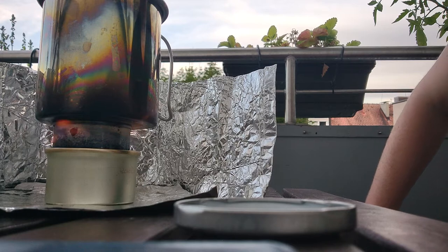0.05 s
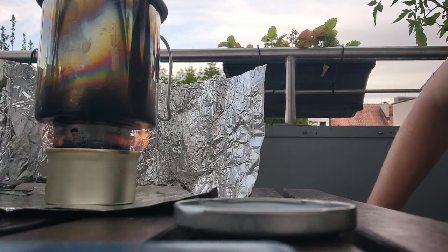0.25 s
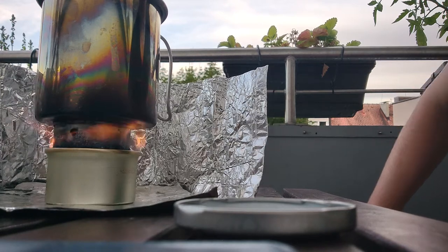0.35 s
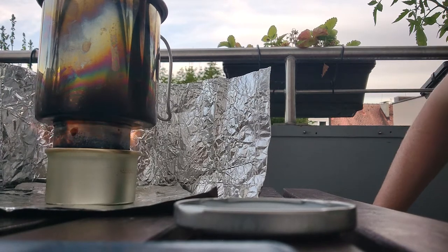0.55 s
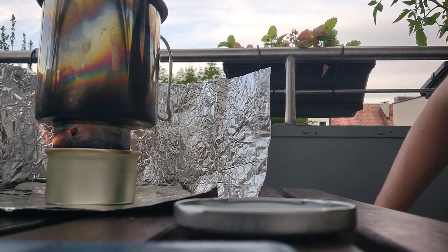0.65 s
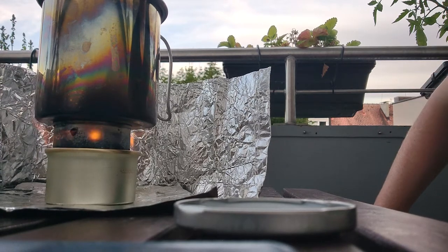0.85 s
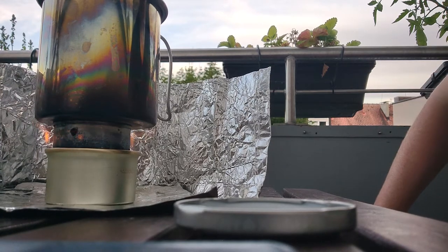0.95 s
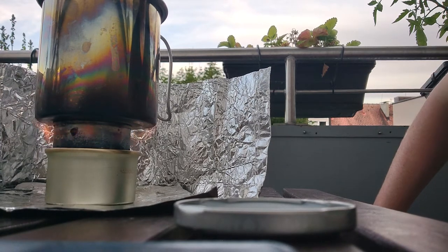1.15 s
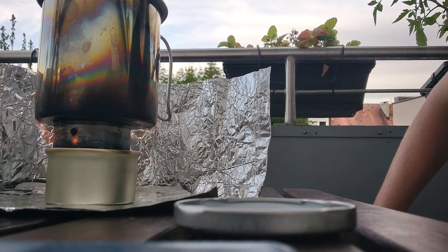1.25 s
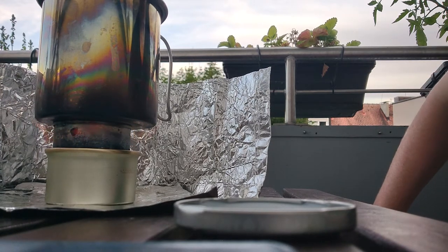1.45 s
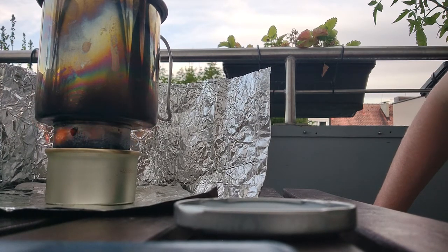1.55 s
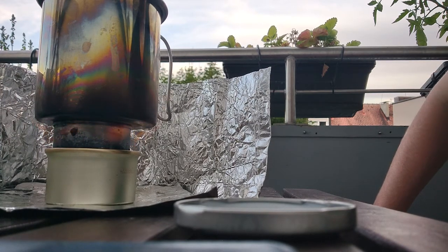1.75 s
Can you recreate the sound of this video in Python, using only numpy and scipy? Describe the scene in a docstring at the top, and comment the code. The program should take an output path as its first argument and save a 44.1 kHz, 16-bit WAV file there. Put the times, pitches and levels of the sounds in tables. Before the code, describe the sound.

A small alcohol stove catches under a steel pot with one short, fluttering puff. The flame settles to a faint, sputtering hiss, the metal ticks once, and a small bird chirps faintly twice, on a quiet balcony.

```python
"""On a quiet balcony, alcohol vapour catches under a steel pot: one short puff of turbulent noise, a bright
rush that sinks into a low flutter, coloured by the resonances of the pot and its foil windscreen.
The flame settles to a faint, sputtering burn with a low hum, and the metal ticks once in its own modes.
A small bird, probably a sparrow, chirps twice across the yard, which echoes both puff and chirps."""
import sys
import numpy as np
from scipy import signal
from scipy.io import wavfile

SR = 44100
rng = np.random.default_rng(int(sys.argv[2]) if len(sys.argv) > 2 else 0)


def wav_out(sig):
    """Save sig, one row per channel (or a flat mono array), as 16-bit PCM at SR to the path in sys.argv[1]."""
    wavfile.write(sys.argv[1], SR, np.round(np.clip(np.atleast_2d(sig).T, -1, 1) * 32767).astype(np.int16))


N = 79380
T = np.arange(N) / SR

# pops and flaps of the spreading flame: start_s, level_db, pitch_hz
POPS = [(.218, -21, 765), (0.2332, -17, 1100), (0.244, -20, 450), (0.256, -12.5, 1250), (0.268, -16.5, 150),
        (.284, -19, 159.8), (.296, -22, 220), (0.3177, -24.5, 134), (0.345, -27.5, 96.5), (.405, -42, 75)]
# stereo position of the quiet noises: frequency_hz, left_minus_right_db
QUIET_BALANCE = [(60, 9.5), (110, -7), (200, 8), (380, -0.5), (700, 0), (1290, -0.5), (2380, -5.5),
                 (4400, -3.5), (8120, 2), (15000, -0.5)]
# likeness of their two channels: frequency_hz, correlation
QUIET_CORRELATION = [(60, 0.94), (250, 0.8), (1000, 0.34), (4000, 0.22), (14000, 0.069)]


def from_db(db):
    """Amplitude ratio of a level in decibels."""
    return 10 ** (np.asarray(db) / 20)


def unit_rms(x):
    """Normalisation to unit power."""
    return x / np.sqrt(np.mean(x ** 2) + 1e-20)


def at_hz(rows, hz):
    """A table's columns, interpolated on a logarithmic frequency axis."""
    frequencies, *columns = np.transpose(rows)
    return [np.interp(np.log(hz), np.log(frequencies), column) for column in columns]


def filtered(x, hz, kind, order=2):
    """Maximally flat low-, high- or band-pass filter."""
    return signal.sosfilt(signal.butter(order, hz, kind, fs=SR, output="sos"), x)


def pan(left_minus_right_db):
    """Direction by level difference, at constant total power."""
    return unit_rms(from_db([[left_minus_right_db / 2], [-left_minus_right_db / 2]]))


def drift(corner_hz):
    """Random modulation of unit rms: low-passed noise, drawn at every 20th sample."""
    pole = np.exp(-2 * np.pi * corner_hz * 20 / SR)
    slow = signal.lfilter([1], [1, -2 * pole, pole * pole], rng.standard_normal(N // 10))[N // 20:]
    return np.interp(np.arange(N) / 20, np.arange(len(slow)), unit_rms(slow))


def swell(full_s, hold_s, rise_db_per_s, fall_db_per_s):
    """Exponential growth, a plateau, then exponential decay."""
    before_s, after_s = np.maximum(full_s - T, 0), np.maximum(T - full_s - hold_s, 0)
    return from_db(-rise_db_per_s * before_s - fall_db_per_s * after_s)


def decay(start_s, t60_s):
    """Exponential decay after a sudden onset."""
    return (T >= start_s) * from_db(-60 * np.maximum(T - start_s, 0) / t60_s)


def resonate(x, hz, width_hz):
    """Damped resonator with unit gain at its peak."""
    radius = np.exp(-np.pi * width_hz / SR)
    feedback = [1, -2 * radius * np.cos(2 * np.pi * hz / SR), radius ** 2]
    return signal.lfilter(np.array([1, 0, -1]) * (1 - radius ** 2) / 2, feedback, x + 1e-18)


def banded_noise(gain_at, correlation=QUIET_CORRELATION, balance=QUIET_BALANCE):
    """Partly coherent stereo noise, summed band by band; gain_at(hz) is the rms in one octave."""
    edges_hz = np.r_[np.geomspace(40, 7200, 16), 9500, 12000, 14200, 16200]
    out, white = 0, rng.standard_normal((2, 2, N))
    for k, (low, high) in enumerate(zip(edges_hz, edges_hz[1:])):
        mid, side = unit_rms(filtered(white[k % 2], [low, high], "band"))
        hz, octaves = np.sqrt(low * high), np.log2(high / low)
        alike = np.clip(at_hz(correlation, hz)[0], -1, 1)
        pair = np.sqrt(1 + alike) * mid + np.sqrt(1 - alike) * side * [[1], [-1]]
        out = out + gain_at(hz) * pan(at_hz(balance, hz)[0]) * pair * np.sqrt(octaves / 2)
    return out


def flickering_noise(spectrum, flicker_db):
    """Random amplitude modulation: each band wavers independently about its level."""
    return banded_noise(lambda hz: from_db(at_hz(spectrum, hz)[0] + flicker_db * drift(16)))


def air():
    """Ambient noise: the faint broadband floor of the open air."""
    # frequency_hz, octave_level_db
    spectrum = [(30, -98), (60, -87.5), (110, -78.5), (200, -78.5), (400, -77.5), (900, -83), (1800, -84),
                (3300, -75), (7000, -87.5), (14000, -83)]
    return flickering_noise(spectrum, flicker_db=0.64)


def puff(roughness_db=1.56, surge_db=2, surge_s=0.0036, catch_s=0.203, spent_s=0.345):
    """Turbulent combustion: the treble peaks first and dies fast; the bass lasts while there is vapour."""
    # the rush by register: frequency_hz, octave_level_db, full_s, hold_s, rise_db_per_s, fall_db_per_s
    registers = [(35, -68, 0.51, 0.032, 498, 172), (71, -45, 0.24, 0.069, 415.5, 172),
                 (176, -33.5, 0.2465, 0.025, 482, 220), (560, -38.5, 0.239, 0.047, 700, 282),
                 (1160, -32.5, 0.2378, 0.013, 739, 291), (2000, -36, 0.2364, 0.015, 872, 389.5),
                 (3710, -30, 0.2341, 0.015, 958, 406), (8100, -33, 0.2357, 0.011, 1454, 452),
                 (13300, -25.5, 0.2334, 0.003, 1792.5, 589)]
    # its stereo position: frequency_hz, left_minus_right_db
    balance = [(60, -15.5), (110, -0.5), (200, 2), (380, -5), (700, -2.5), (1290, -1), (2380, -5),
               (4400, -4), (8120, 1), (15000, 5)]
    # likeness of its two channels: frequency_hz, correlation
    correlation = [(60, 0.59), (200, .8), (600, 0.68), (1200, 0.51), (3000, 0.21), (7000, 0.13),
                   (14000, -0.24)]
    surges = sum(np.exp(-((T - start_s) / surge_s) ** 2) for start_s, _, _ in POPS)
    flame = from_db(roughness_db * drift(82) + surge_db * (surges - 0.5))
    flame *= swell(catch_s, spent_s - catch_s, rise_db_per_s=280, fall_db_per_s=480)

    def gain_at(hz):
        level_db, *shape = at_hz(registers, hz)
        return from_db(level_db) * swell(*shape) * flame
    return pot(banded_noise(gain_at, correlation, balance))


def pot(x, coupling=1):
    """Forced resonance: the pot and burner boost the flame's noise at their natural frequencies."""
    # resonances at full coupling: frequency_hz, width_hz, boost_db
    modes = [(204, 30, 2), (661, 13, 4), (745, 8.5, 8), (947.6, 31, 7.5), (1014, 37, 6), (1393, 115, 7.5),
             (2180, 52, 2.5), (2354, 100, 10.5), (2639, 39, 10.5), (3150, 56, 10.5), (3910, 85, 10),
             (4120, 32, 11), (4612, 45, 11.5), (8200, 31, 4), (13800, 23, 13.5)]
    return x + coupling * sum((from_db(db) - 1) * resonate(x, hz, width) for hz, width, db in modes)


def echoes(x, t60_s, dull_hz=5100):
    """Diffuse reverberation: dense, dull reflections that die away, different on each side."""
    response = filtered(rng.standard_normal((2, N)), dull_hz, "low") * decay(0, t60_s)
    return signal.fftconvolve(np.atleast_2d(x), unit_rms(response) / np.sqrt(N), axes=1)[:, :N]


def pops(cycles_to_fall_60_db=1.62):
    """Heavily damped oscillation: each flap of the flame is about one swing of pressure."""
    out = 0
    for start_s, level_db, pitch_hz in POPS:
        cycles = np.maximum(T - start_s, 0) * pitch_hz
        out = out + from_db(level_db - 60 * cycles / cycles_to_fall_60_db) * np.sin(2 * np.pi * cycles)
    return out * pan(-2)


def burn(start_s=0.23, grow_s=0.06, settle_db_per_s=24):
    """Combustion noise: a faint hiss and a dying rumble excite the pot weakly, above a hum."""
    # the steady flame: frequency_hz, octave_level_db
    hiss_spectrum = [(60, -85.5), (200, -92.5), (500, -92), (1200, -77), (1800, -85), (2700, -72.5),
                     (4200, -73), (6000, -79), (9500, -87.5), (13000, -77), (15000, -73)]
    # the settling flame at its start: frequency_hz, octave_level_db
    rumble_spectrum = [(40, -76), (90, -65.5), (180, -60.5), (380, -62.5), (800, -63.5), (1600, -67),
                       (4000, -69), (14000, -105)]
    rumble = flickering_noise(rumble_spectrum, flicker_db=2) * from_db(-settle_db_per_s * (T - start_s))
    hiss = flickering_noise(hiss_spectrum, flicker_db=0.2)
    alight = np.clip((T - start_s) / grow_s, 0, 1)
    return alight * (pot(hiss + rumble, coupling=0.4) + hum())


def hum(pitch_hz=205.7, level_db=-76.5, swell_at_s=1.168, swell_s=0.017, swell_db=-62):
    """Narrow-band noise is heard as a wavering hum; a brief tone at the same pitch swells it once."""
    wavering = from_db(level_db) * unit_rms(resonate(rng.standard_normal(N), pitch_hz, width_hz=11.2))
    envelope = from_db(swell_db) * np.exp(-((T - swell_at_s) / swell_s) ** 2)
    tone = np.sqrt(2) * np.sin(2 * np.pi * pitch_hz * T)
    return (wavering + envelope * tone) * pan(-1)


def bird(buzz_hz=355, buzz_jitter=0.1035, swing_hz=430, buzz_depth=0.4, waver_hz=90):
    """Fast frequency and amplitude modulation make an arching whistle rasp; walls and yard reflect it."""
    # the two calls: start_s, level_db
    chirps = [(0.267, -53.5), (1.383, -49)]
    # the contour that they share: elapsed_s, pitch_hz, relative_db
    contour = [(0, 3500, -32), (.004, 3750, -16), (.014, 4150, -15), (.032, 4000, -10), (.043, 4030, -1),
               (.058, 3850, -2), (.073, 3600, 0), (.092, 3500, -6), (.104, 2850, -16), (.114, 2600, -40)]
    elapsed_s, contour_hz, contour_db = np.transpose(contour)
    song = 0
    for start_s, level_db in chirps:
        age_s = T - start_s
        buzz_phase = 2 * np.pi * np.cumsum(buzz_hz * (1 + buzz_jitter * drift(60))) / SR
        pitch_hz = np.interp(age_s, elapsed_s, contour_hz)
        pitch_hz += swing_hz * np.sin(buzz_phase) + waver_hz * drift(150)
        sounding = (age_s > 0) & (age_s < elapsed_s[-1])
        envelope = from_db(level_db + np.interp(age_s, elapsed_s, contour_db)) * sounding
        rasp = 1 + buzz_depth * np.cos(buzz_phase)
        song = song + envelope * rasp * np.sin(2 * np.pi * np.cumsum(pitch_hz) / SR)
    near_walls = from_db(1) * echoes(song, t60_s=0.037)
    yard = from_db(-7.5) * echoes(song, t60_s=0.59)
    return (song + near_walls) * pan(-6) + yard


def sputters():
    """Noise transients: the flame spits in small, dull bursts that decay exponentially."""
    # spits of the flame: start_s, level_db
    spits = [(0.414, -63), (.518, -55), (.582, -56), (1.485, -65)]
    # their spectrum: frequency_hz, relative_octave_level_db
    colour = [(200, -7.5), (800, -7), (1800, -0.5), (3000, -4), (6000, -22), (15000, -35)]
    envelope = sum(from_db(level_db) * decay(start_s, t60_s=0.059) for start_s, level_db in spits)
    return envelope * unit_rms(banded_noise(lambda hz: from_db(at_hz(colour, hz)[0])))


def tick(start_s=0.7076, ring_delay_s=0.0012, crack_db=-56.5, ring_db=-60):
    """Free vibration: the metal cracks, then rings for a moment in its damped modes."""
    # modes of the metal: frequency_hz, relative_db, t60_s
    modes = [(1860, 1, 0.028), (2580, 3.5, 0.047), (3280, 3, 0.026), (3800, 5, .028), (4450, 4, .025),
             (5220, -3, .02), (6000, -4, 0.022)]
    hiss = unit_rms(filtered(rng.standard_normal((2, N)), 6000, "high"))
    crack = decay(start_s, t60_s=0.012) * hiss
    ring, ring_start_s = 0, start_s + ring_delay_s
    for hz, db, t60_s in modes:
        phase = 2 * np.pi * hz * (T - ring_start_s) + rng.standard_normal((2, 1))
        ring = ring + from_db(db) * decay(ring_start_s, t60_s) * np.sin(phase)
    return from_db(crack_db) * crack + from_db(ring_db) * ring


def scene():
    """Superposition: the ignition and its reverberation in the yard, over the quiet sounds."""
    ignition = puff() + pops()
    yard = from_db(-32.5) * echoes(ignition, t60_s=2.54)
    return ignition + yard + tick() + sputters() + bird() + air() + burn()


def record(dry, low_cut_hz=45, high_cut_hz=15850):
    """Band limiting: the microphone drops the deep bass, and the top is cut steeply."""
    thin = filtered(dry, low_cut_hz, "high", order=4)
    return signal.sosfilt(signal.ellip(12, 0.1, 80, high_cut_hz, fs=SR, output="sos"), thin)


dry = scene()
out = record(dry)
wav_out(out)
```